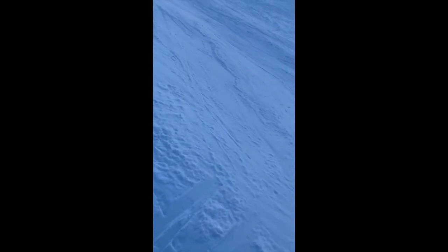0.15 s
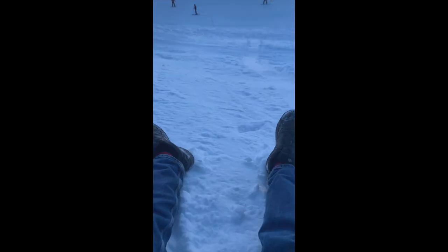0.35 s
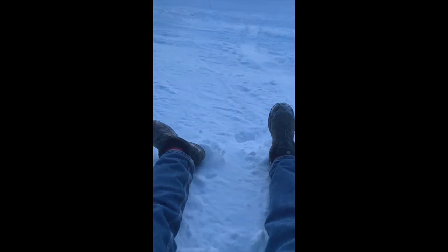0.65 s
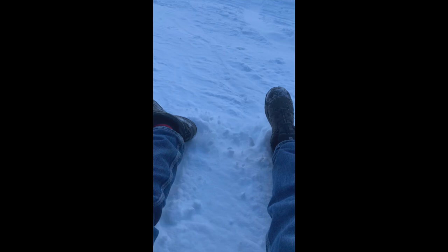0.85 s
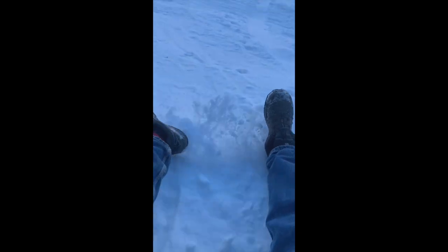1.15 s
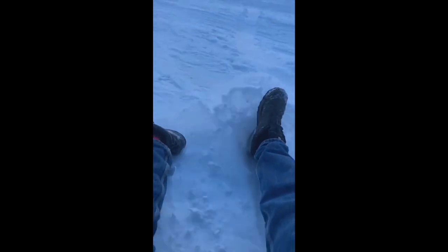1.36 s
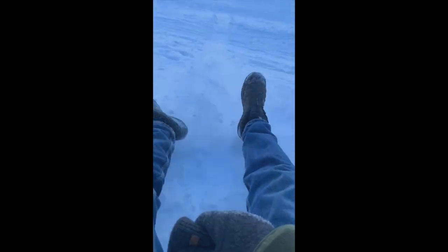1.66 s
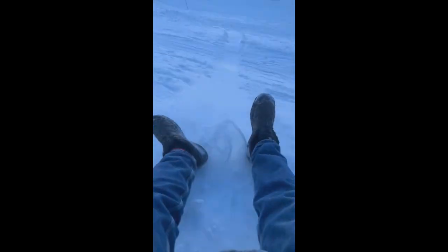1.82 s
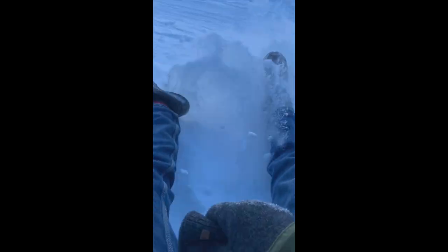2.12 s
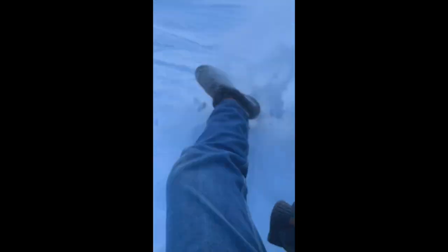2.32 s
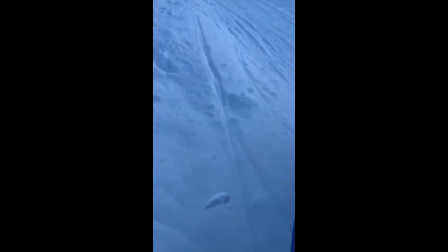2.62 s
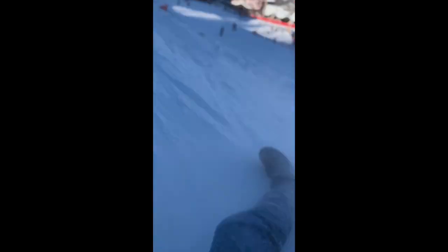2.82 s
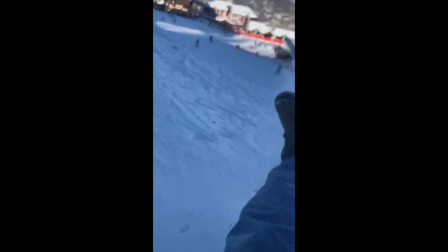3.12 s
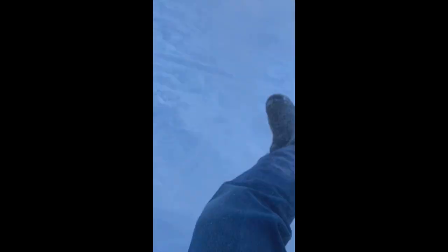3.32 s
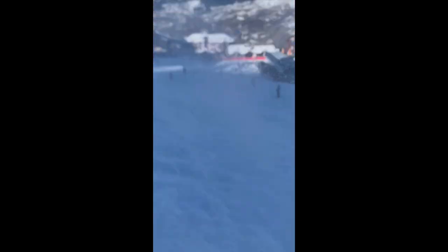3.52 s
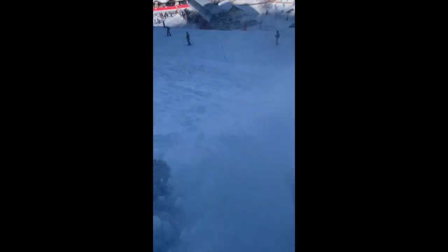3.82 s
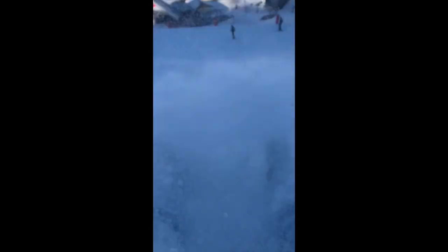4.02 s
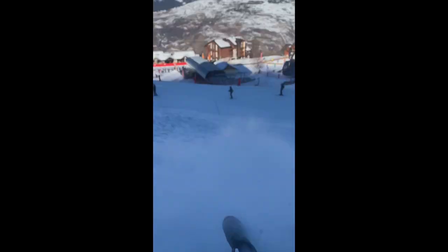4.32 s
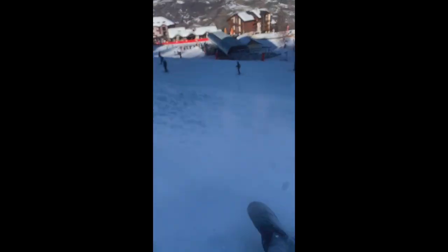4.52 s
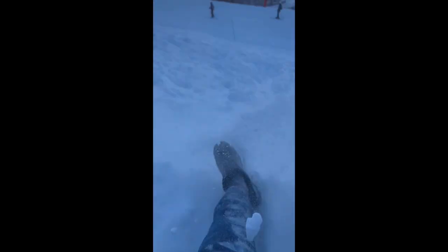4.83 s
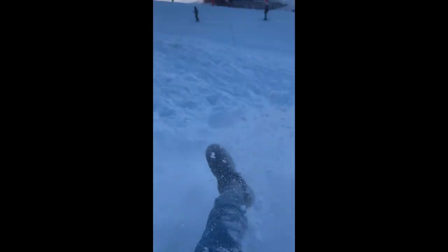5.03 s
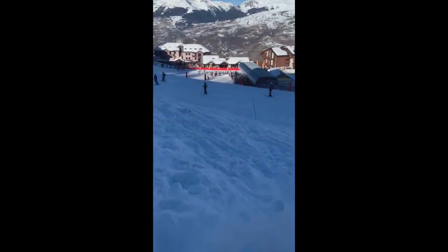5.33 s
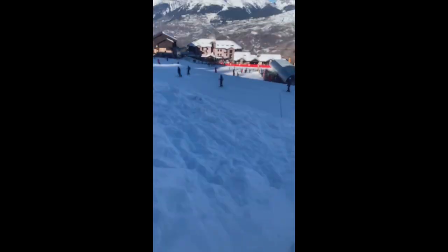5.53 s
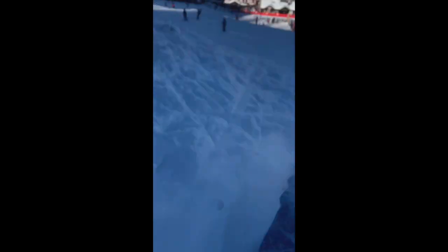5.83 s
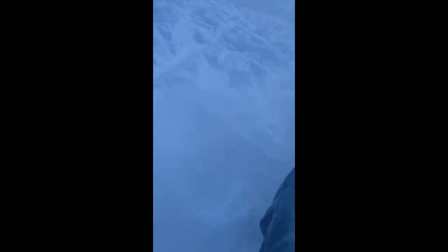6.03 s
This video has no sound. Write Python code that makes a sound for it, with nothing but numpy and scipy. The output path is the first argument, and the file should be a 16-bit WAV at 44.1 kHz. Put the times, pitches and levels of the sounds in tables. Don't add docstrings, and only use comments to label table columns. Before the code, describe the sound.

Bumpy sled ride over snow: after a faint start, hollow plastic thuds, crunching crust and spraying powder build under blustery low wind rumble.

```python
import sys
import numpy as np
from scipy import signal
from scipy.fft import rfft, irfft, next_fast_len
from scipy.io import wavfile
from scipy.ndimage import uniform_filter1d

SR = 44100
rng = np.random.default_rng(int(sys.argv[2]) if len(sys.argv) > 2 else 0)


def how_loud(loudness_db):
    steps = np.asarray(loudness_db, float) / 20
    return 10 ** steps


def generate_wav(signal):
    frames = np.transpose(np.atleast_2d(signal))
    scaled = np.clip(frames, -1, 1) * 32767
    pcm = np.round(scaled).astype(np.int16)
    wavfile.write(sys.argv[1], SR, pcm)


N = 271656


def rms_one(x):
    return x / np.sqrt(np.mean(x ** 2) + 1e-20)


def in_time(rows):
    s, *columns = np.transpose(rows)
    return [np.interp(np.arange(N) / SR, s, column) for column in columns]


def steep(x, hz, kind):
    return signal.sosfilt(signal.butter(6, hz, kind, fs=SR, output="sos"), x)


def drift(rate):
    r = np.exp(-80 * np.pi * rate / SR)
    noise = rng.standard_normal(N // 40 + 2002)
    slow = signal.lfilter([1], [1, -2 * r, r * r], noise)[2000:]
    return np.interp(np.arange(N) / 40, np.arange(len(slow)), rms_one(slow))


def grains(per_s, spread_db):
    sizes_db = spread_db * np.minimum(rng.exponential(1, N), 4.5)
    sizes = how_loud(sizes_db) * rng.choice([-1, 1], N)
    return rms_one(sizes * (rng.random(N) < per_s / SR))


def coloured(spectrum, drive, share, shared_db, own_db, rate):
    hz, level = np.transpose(spectrum)
    edges = hz[0] * 2 ** np.arange(0, np.log2(hz[-1] / hz[0]) + .3, 1 / 3)
    fed = np.sqrt(1 - share) * rng.standard_normal((2, N)) + np.sqrt(share) * drive
    out, together = 0, drift(rate)
    for k, (low, high) in enumerate(zip(edges, edges[1:])):
        band_pass = signal.butter(2, [low, high], "band", fs=SR, output="sos")
        band = signal.sosfilt(band_pass, fed[k % 2])
        level_db = np.interp(np.log(low * high) / 2, np.log(hz), level)
        out = out + band * how_loud(level_db + shared_db * together + own_db * drift(rate * 0.84))
    return rms_one(out)


def evened(x, span_s, share):
    span = int(span_s * SR)
    level = uniform_filter1d(uniform_filter1d(x ** 2, size=span), size=span)
    return rms_one(x / (level + .02) ** (share / 2))


def swells(bed_db, s, peak_db, fall_s, rise):
    crest_round = 1.11
    t = np.arange(0, N, 64) / SR
    age = (t - s[:, None]) / np.maximum(fall_s, .005)[:, None]
    event_db = peak_db[:, None] - 10 * np.maximum(age, -age / rise) ** crest_round
    power = (how_loud(event_db) ** 2).sum(axis=0)
    return 10 * np.log10(how_loud(bed_db) ** 2 + np.interp(np.arange(N) / SR, t, power))


# pitch_hz, level_db
LIFT = [
    (1060, -54),
    (4200, -60),
]


def open_air(level_db):
    hiss = how_loud(level_db) * rms_one(steep(rng.standard_normal((2, N)), [900, 8300], "band"))
    whine = 0
    for hz, db in LIFT:
        tone = steep(rng.standard_normal(N), [hz - 20, hz + 20], "band")
        whine = whine + how_loud(db) * rms_one(tone)
    return hiss + whine


# time_s, level_db
RUSTLE = [
    (0, -55),
    (.2, -69),
    (.3, -59.5),
    (5.35, -55.5),
    (5.6, -52),
    (5.75, -47.5),
    (6.16, -47),
]


def jacket_rustle():
    level_db, = in_time(RUSTLE)
    return how_loud(level_db) * rms_one(steep(rng.standard_normal(N), [3900, 4700], "band"))


# crest_s, level_db, fall_10db_s
GUSTS = [(0, -16, -0.8), (.19, -33.5, 1), (.5, -34, 0.3), (.67, -28, .03), (.95, -28, 0), (1.09, -29, 0.1),
         (1.42, -12.5, -0.09), (1.5, -24, .05), (1.6, -22, -0.1), (1.78, -24, -0.2), (1.93, -38, -0.2),
         (2.0, -29, 0), (2.1, -21, 0.04), (2.24, -43, 0.4), (2.3, -31, 0), (2.57, -25, 0.1),
         (2.63, -18, -0.01), (2.784, -6.5, 0.0133), (2.9, -21, 0.08), (3.04, -13, -0.02), (3.28, -29, 0.7),
         (3.41, -16, -0.02), (3.52, -35, 0.7), (3.62, -26.5, 0.12), (3.72, -24, 0.14), (3.91, -20, 0.03),
         (4.04, -22, 0), (4.22, -18.5, 0.04), (4.3, -19, -0.18), (4.56, -23, 0.13), (4.95, -23.5, 0.27),
         (5.08, -28, 0.4), (5.22, -20, 0.07), (5.37, -20, 0), (5.64, -19.5, 0.2), (5.75, -19, -0.12),
         (5.9, -22, .04), (6.11, -18.5, 0.27)]


def gust_level():
    calm_db = -46 + 1.5 * np.arange(N) / SR
    return swells(calm_db, *np.transpose(GUSTS), rise=0.94)


# frequency_hz, density_db_per_hz
DEEP = [(13, -39), (22, -28), (64, 2.5), (119, -1), (170, -6), (220, -19), (370, -120)]


def wind_buffet():
    buffet = coloured(DEEP, rng.standard_normal(N), share=0.89, shared_db=-2.5, own_db=1.5, rate=7.3)
    return evened(buffet, span_s=0.038, share=0.59)


# frequency_hz, density_db_per_hz
FLUTTER = [(100, -37), (170, -1), (350, 6.5), (500, 4.5), (650, 2.5), (800, -20), (1000, 6)]
# time_s, flutter_db, unfolded_bass_re_flutter_db
CROSS = [(0, -46, -1), (.13, -53.5, 0), (.3, -47, -2), (.8, -45, -17), (1.0, -40, -24), (1.5, -36, -7.5),
         (1.9, -29, 3), (2.3, -24, -7), (2.62, -32.5, 8), (2.8, -23, -3), (3.2, -21.5, -4), (3.4, -25, -46),
         (4.0, -35, -56), (4.4, -39, -68.5), (4.7, -36, -69), (5.15, -38.5, -22), (5.75, -21.5, -37),
         (6.16, -29.5, -31)]


def port_wind(deep, hull_db):
    steady_db, unfolded_db = in_time(CROSS)
    jolt_db = hull_db - uniform_filter1d(hull_db, size=SR // 3)
    flutter_db = steady_db + 0.56 * jolt_db
    deep_db = flutter_db + unfolded_db
    eddies = grains(per_s=91, spread_db=3.0)
    flutter = coloured(FLUTTER, eddies, share=.4, shared_db=3.5, own_db=2.0, rate=22)
    bass = signal.sosfiltfilt(signal.butter(4, 400, fs=SR, output="sos"), flutter)
    low_db = np.minimum(flutter_db, deep_db + 20)
    low = how_loud(low_db + 2.5) * bass
    high = how_loud(flutter_db + 2.5) * (flutter - bass)
    return how_loud(deep_db - 3) * deep + low + high


# centre_s, half_length_s, hull_drop_db, scrape_drop_db
HOPS = [(0.095, 0.1, 6, 5.5), (0.903, .04, -4, -1.5), (1.306, 0.021, 5, 2.5), (1.518, 0.015, 2.5, 2),
        (1.805, 0.02, 6, 7.5), (1.882, 0.026, 12, 4), (2.18, 0.021, 13, 4), (2.407, 0.023, 10, 0.5),
        (2.576, 0.011, 7, 9), (2.622, 0.01, -2, 14), (2.675, 0.047, 11, 1.5), (2.905, .02, 14, 2),
        (3.067, 0.039, 10, 5), (3.22, 0.039, 10, 6), (3.332, 0.013, 12, 0.5), (3.58, 0.019, 5, -0.5),
        (3.792, 0.027, 7, 6), (4.075, 0.014, 8, 3.5), (4.335, .02, -4, 0.5), (4.49, 0.023, 3, 1.5),
        (4.817, 0.037, 5, 3.5), (5.032, 0.026, 12, 4.5), (5.134, 0.025, 15, 5.5), (5.235, .02, 9, 2.5),
        (5.49, 0.054, 10, 6.5), (5.764, .02, 7, 1), (5.85, 0.012, 8.5, 4.5), (6.066, 0.014, 4, 2)]


def hops():
    s, half_s, *drops_db = np.transpose(HOPS)
    t = np.arange(0, N, 64) / SR
    clear = np.exp(-((t - s[:, None]) / half_s[:, None]) ** 2)
    return [np.interp(np.arange(N) / SR, t, drop_db @ clear) for drop_db in drops_db]


# time_s, level_db
SPRAY = [(0, -54), (.03, -74), (.2, -71), (.24, -45.5), (.63, -44.5), (1.05, -35.5), (1.52, -47.5),
         (1.68, -40), (1.8, -35), (2.2, -39.5), (2.6, -37.5), (3.05, -38), (3.3, -34.5), (3.55, -35.5),
         (3.85, -34), (4.3, -38.5), (5.0, -37.5), (6.16, -41)]
# crest_s, scrape_db, fall_10db_s, powder_re_scrape_db
PATCHES = [(.03, -41, 0.4, -28), (.08, -52, -0.3, -6), (1.1, -42.5, 0.2, -4), (1.39, -32.5, 0.01, 1.5),
           (1.456, -34, -0.01, 6), (1.57, -33, 0.53, -7), (1.75, -35, -0.07, 3), (1.9, -37, -0.03, -3),
           (1.97, -36, 0, -5), (2.06, -32, 0.12, -4), (2.282, -28.5, 0.09, -1), (2.46, -29.5, 0.09, -5.5),
           (2.52, -30, 0.02, -14), (2.555, -33, -0.05, -10), (2.6, -32.5, -0.04, -10),
           (2.709, -31.5, 0, -5), (2.826, -26, -0.01, -4), (2.998, -31.5, 0.22, -19.5),
           (3.127, -29, 0.1, -14), (3.29, -35, -0.17, 7.5), (3.33, -33, 0.03, 1.5), (3.379, -22, -0.04, 0),
           (3.46, -30, 0.1, -28), (3.728, -25, 0.04, -9.5), (3.93, -24, -0.09, -11), (4.01, -35, -0.24, 5),
           (4.1, -31, 0.2, -13), (4.3, -39, 0.7, -20), (4.44, -33.5, -1, -6.5), (4.56, -25.5, -0.02, -1),
           (4.63, -27, 0.09, -7.5), (4.69, -30.5, 0.04, -2.5), (4.738, -24, 0.04, -6),
           (4.93, -35, -0.1, -3.5), (5.27, -35.5, 0.7, -34), (5.68, -33, 0.015, 2), (5.71, -35, 0.01, 1.5),
           (5.832, -26, 0.07, -4), (5.89, -29, -0.03, -3), (5.96, -31, 0, 0), (6.05, -29.5, 0.04, -3)]


def snow_levels():
    spray_db, = in_time(SPRAY)
    s, peak_db, fall_s, kicked_db = np.transpose(PATCHES)
    powder_db = peak_db + kicked_db
    glide_db = np.maximum(spray_db + 0.5, -63)
    scrape_db = swells(glide_db, s, peak_db, fall_s, rise=1.0)
    grit_db = swells(spray_db - 5.5, s, powder_db - 7, fall_s, rise=1.0)
    return scrape_db, grit_db, swells(spray_db, s, powder_db, fall_s, rise=1.0)


# frequency_hz, density_db_per_hz
CRUST = [(300, -9.5), (500, -2.5), (800, 3), (1200, -6), (1700, -9.5), (2200, -15), (3000, -18),
         (4500, -13)]
# frequency_hz, density_db_per_hz
POWDER = [(1200, -14), (2200, -2), (3400, 1), (4300, 1), (5000, 0), (8000, 0), (12000, 0), (16000, 0)]
# time_s, upper_scrape_re_lower_db
HARDNESS = [(0, 1.5), (.5, 3), (1.0, 2), (1.5, -7.5), (1.9, 1.5), (2.2, 2.5), (2.5, -1), (2.8, 12.5),
            (3.0, -5), (3.17, 11.5), (3.4, 1), (3.8, 1.5), (4.2, 2.5), (4.6, 0.5), (5.0, 2.5), (5.4, 0.5),
            (5.8, 3.5), (6.16, -0.5)]


def snow_layers():
    hard_db, = in_time(HARDNESS)
    crunch = grains(per_s=900, spread_db=-1.5)
    crust = coloured(CRUST, crunch, share=0.37, shared_db=1.74, own_db=1.44, rate=35)
    soft = signal.sosfiltfilt(signal.butter(2, 977, fs=SR, output="sos"), crust)
    crust = soft * how_loud(-hard_db / 2) + (crust - soft) * how_loud(hard_db / 2)
    powder = coloured(POWDER, crunch, share=.2, shared_db=1.3, own_db=.6, rate=30)
    grit = rms_one(steep(powder, 4300, "low"))
    fine = rms_one(steep(powder, 4000, "high"))
    return np.array([crust, grit, fine])


# start_s, peak_db, brightness_db
CRACKS = [(0.024, -31, -22), (0.564, -27, -20), (0.645, -24, -19), (0.756, -31.5, -14), (0.974, -16, -26),
          (1.019, -22.5, -23), (1.099, -21, -19), (1.275, -21, -14), (1.325, -21, -18), (1.358, -22, -20),
          (1.381, -21, -19), (1.455, -14, -28), (1.497, -22, -27), (1.53, -24, -14), (1.664, -31, -21),
          (1.744, -14, -29.5), (1.9, -16.5, -23), (1.939, -26, -15), (1.954, -15, -17), (2.012, -16, -24),
          (2.055, -14, -17), (2.179, -24, -22), (2.259, -31, -16), (2.317, -14, -11), (2.344, -18, -9),
          (2.512, -11, -12.5), (2.593, -17, -9.5), (2.63, -29, -14), (2.922, -18.5, -12), (2.959, -22, -15),
          (3.02, -36, -22.5), (3.064, -23, -23), (3.127, -5, -34), (3.293, -6.5, -12.5), (3.355, -10, -10),
          (3.38, -6, -13.5), (3.466, -23, -20), (3.679, -12, -21), (3.723, -30, -20), (3.815, -17, -10),
          (3.864, -19.5, -15), (3.89, -13, -16), (3.916, -13, -21), (3.972, -18, -10), (4.014, -16, -7),
          (4.088, -16, -15), (4.3, -17, -17), (4.433, -15.5, -14), (4.536, -13, -10), (4.622, -21, -14),
          (4.72, -10, -12), (4.925, -13, -20), (5.055, -17, -10), (5.233, -27, -20), (5.5, -21, -15),
          (5.523, -24, -18.5), (5.665, -15.5, -11), (5.806, -12.5, -9), (5.967, -17, -9), (6.077, -17, -20)]


def cracks(decay_s, gain_db):
    out, t = np.zeros((2, N + 1500)), np.arange(1500) / SR
    envelope = t / decay_s * np.exp(1 - t / decay_s)
    for s, peak_db, bright_db in CRACKS:
        burst = how_loud(peak_db + gain_db) * rng.standard_normal(len(t)) * envelope
        out[:, round(s * SR):][:, :len(t)] += burst * how_loud([[0], [bright_db]])
    body, bright = out[:, :N]
    dull = signal.sosfilt(signal.butter(2, [380, 1500], "band", fs=SR, output="sos"), body)
    puff = signal.sosfilt(signal.butter(2, 3000, "high", fs=SR, output="sos"), bright)
    snap = signal.sosfilt(signal.butter(2, [1500, 3500], "band", fs=SR, output="sos"), body)
    return 5.8 * dull + 3.0 * puff + 1.6 * snap


# frequency_hz, lead_rad
PORT_PHASE = [(100, 0.0), (430, .1), (700, 2.1), (1250, 1.65), (1850, -.05), (2600, -2.3), (3400, -1.55),
              (4665, -3.14)]
PATH_TURN_HZ = 4245


def two_ports(x, stray, stray_share, dwell):
    size = next_fast_len(N + 2048)
    hz = np.arange(size // 2 + 1) * SR / size
    at, lead = np.transpose(PORT_PHASE)
    gap = np.interp(hz, at, lead) - 2 * np.pi * np.maximum(hz - at[-1], 0) / PATH_TURN_HZ
    gap -= dwell * np.sin(2 * gap) * np.clip((hz - 3400) / 600, 0, 1)
    mixed = np.sqrt(1 - stray_share) * x + np.sqrt(stray_share) * stray
    mid = irfft(rfft(x, size) * np.cos(gap / 2), size)[:N]
    side = irfft(rfft(mixed, size) * -1j * np.sin(gap / 2), size)[:N]
    return mid + how_loud(-.6) * side * [[1], [-1]]


# time_s, load_db, rim_lean_db
LOAD = [(0, -39.5, -23), (.19, -44, -7.5), (.24, -29.5, 3.5), (.86, -32.5, 4.5), (1.0, -25.5, 2.5),
        (1.6, -20, 6.5), (1.72, -29.5, 4.5), (1.9, -36, 6.5), (2.5, -27.5, 4.5), (2.7, -30, -20),
        (2.85, -22.5, -5.5), (3.1, -27.5, 1), (3.85, -28, -5), (4.5, -21.5, 4.5), (5.0, -25.5, 1.5),
        (5.58, -17, -14), (5.76, -27.5, -10), (6.16, -40, -7.5)]
# crest_s, strength_db, fall_10db_s, rim_lean_db
DRIFTS = [(1.04, -17, 0.02, 5), (1.2, -23, -0.23, 9), (1.418, -19, 0.0367, 5), (1.64, -18, 0.0533, -7),
          (1.752, -12, 0, 6.5), (2.031, -17, 0.01, 7), (2.3, -22.5, 0.09, -11), (2.48, -29, -0.46, 7),
          (2.63, -31, 0.2, -25), (2.78, -21.5, 0.04, -35), (2.989, -19.5, -0.08, 6),
          (3.127, -19, -0.08, -11), (3.191, -14, 0, -11), (3.302, -19.5, -0.0732, 21),
          (3.4, -19.5, 0.24, -22.5), (3.504, -12.5, 0.01, 6.5), (3.717, -13, 0.0245, 3.5),
          (3.949, -14, 0, 1), (4.167, -13, 0.106, -3), (4.29, -15, 0.01, -9), (4.562, -10.5, 0.024, -3),
          (4.747, -8, 0.0265, 1.5), (4.97, -18.5, 0.02, -8), (5.098, -17.5, 0.17, -17.5),
          (5.2, -14.5, 0.12, -23), (5.34, -17.5, 0.26, -24), (5.667, -7.5, -0.23, 1),
          (5.82, -14.5, 0.05, -15), (5.9, -8, -0.04, 0.5), (6.1, -20, 0.4, -40)]


def hull_levels():
    load_db, lean_db = in_time(LOAD)
    s, peak_db, fall_s, rim_db = np.transpose(DRIFTS)
    hull_db = swells(load_db, s, peak_db, fall_s, rise=1.5)
    return hull_db, swells(load_db + lean_db, s, peak_db + rim_db, fall_s, rise=1.5)


# frequency_hz, density_db_per_hz
HULL = [(90, -23), (150, -6.5), (210, -0.5), (270, 0), (350, -0.5), (480, -4.5), (600, -11), (750, -7)]


def hull_drumming(hull_db, rim_db):
    knocks = grains(per_s=130, spread_db=4.5)
    drum = coloured(HULL, knocks, share=0.48, shared_db=3.0, own_db=1.36, rate=52.0)
    hull = evened(rms_one(steep(drum, 428, "low")), span_s=0.034, share=0.47)
    rim = rms_one(steep(drum, [430, 650], "band") * how_loud(0.66 * drift(92)))
    rim = evened(rim, span_s=0.031, share=0.79)
    return how_loud(hull_db) * hull + how_loud(rim_db - 7.5) * rim


# start_s, peak_db, ring_hz, cycles_to_crest
LUMPS = [(0.67, -16, 181, 0.58), (0.971, -12, 410, 1), (1.102, -9, 160, 0.61), (1.172, -11.5, 284, 1),
         (1.32, -11, 523, 0.9), (1.364, -7, 293, 0.75), (1.404, -7, 158, 0.68), (1.503, -7, 378, 0.81),
         (1.527, -4, 296, 0.6), (1.639, -8, 257, 0.96), (1.741, -4, 336, 1), (2.058, -6, 293, 0.96),
         (2.218, -22, 253, 0.9), (2.278, -5, 306, 1), (2.43, -14, 310, 0.99), (2.467, -11.5, 275, 0.9),
         (2.512, -7, 301, 0.73), (2.605, -15.5, 155, 0.99), (2.71, -17.5, 220, 0.8), (2.765, -2, 182, 0.8),
         (2.832, -13, 277, 1), (2.931, -17, 199, 0.76), (3.122, -13, 254, 0.77), (3.295, -2, 268, 0.72),
         (3.354, -8, 202, 0.72), (3.494, -10, 263, 1), (3.61, -10.5, 246, 1), (3.822, -16, 220, 0.9),
         (3.88, -6.5, 274, 0.86), (3.935, -3.5, 278, 0.97), (4.014, -5.5, 513, 1), (4.092, -7, 344, 0.64),
         (4.363, -5, 274, 0.9), (4.404, -10, 304, 0.9), (4.435, -4.5, 390, 1), (4.566, -2, 229, 0.78),
         (4.859, -7, 240, 0.71), (5.089, -10, 205, 0.44), (5.191, -4.5, 313, 1), (5.275, -24, 444, 0.9),
         (5.278, -3.5, 233, 0.74), (5.43, -9.5, 285, 0.71), (5.466, -14, 363, 1), (5.729, -8, 265, 0.99),
         (5.777, -12, 356, 0.98), (5.813, -6, 267, 0.7), (5.886, -5, 175, 0.61), (5.953, -5, 285, 0.79),
         (6.006, -9, 304, 0.9), (6.081, 1, 281, 0.64)]


def lumps(gain_db):
    sag = 0.082
    bounce_cycles, bounce_db = 3.0, -5.5
    out, t = np.zeros(N + 4410), np.arange(4410) / SR
    for (s, peak_db, hz, cycles), turn in zip(LUMPS, rng.random(len(LUMPS))):
        age = t * hz / cycles
        phase = 1.12 * np.log1p(sag * hz * t) / sag + turn
        shape = age * np.exp(1 - age) * np.sin(2 * np.pi * phase)
        lag = int(bounce_cycles / hz * SR)
        shape[lag:] += how_loud(bounce_db) * shape[:len(t) - lag]
        out[round(s * SR):][:len(t)] += how_loud(peak_db + gain_db) * shape
    return out[:N]


# time_s, level_db
ASIDE = [
    (0, -5),
    (2.25, -0.5),
    (2.5, -4),
    (3.25, -8),
    (3.5, -7),
    (5.3, -16),
    (6.16, -4),
]


def from_aside(hull):
    size = next_fast_len(N + 2048)
    hz = np.arange(size // 2 + 1) * SR / size
    lead = irfft(rfft(hull, size) * -1j * np.minimum(hz / 774, 1), size)[:N]
    aside_db, = in_time(ASIDE)
    folded = np.arange(N) / SR > 3.3
    return how_loud(aside_db) * np.where(folded, steep(lead, 500, "high"), lead)


# time_s, left_minus_right_db
TURN = [
    (0, -1.2),
    (.7, -2.6),
    (1.3, -2.8),
    (1.8, -2),
    (2.4, -.5),
    (2.8, .4),
    (3.2, 0),
    (6.16, 0),
]


def scene():
    deep_db = gust_level()
    hull_db, rim_db = hull_levels()
    scrape_db, grit_db, spray_db = snow_levels()
    hull_off_db, scrape_off_db = hops()
    hull_db, rim_db = hull_db - hull_off_db, rim_db - hull_off_db
    scrape_db, grit_db = scrape_db - scrape_off_db, grit_db - 0.55 * scrape_off_db

    buffet = wind_buffet()
    body = hull_drumming(hull_db, rim_db) + lumps(gain_db=-3.0)
    common = how_loud(deep_db) * buffet + body + jacket_rustle()
    turn_db, = in_time(TURN)
    turned = common * how_loud([turn_db / 2, -turn_db / 2])

    levels = how_loud([scrape_db + 6.0, grit_db + 4.0, spray_db + 5.5])
    layers = snow_layers()
    breaks = cracks(decay_s=0.0017, gain_db=-7.0)
    snow = (levels * layers).sum(axis=0) + breaks
    unrelated = (levels * np.roll(layers, N // 3, axis=1)).sum(axis=0) + breaks
    airborne = two_ports(snow, unrelated, stray_share=.5, dwell=.21)
    diffuse_band = signal.butter(2, [1400, 2200], "band", fs=SR, output="sos")
    diffuse = how_loud(-4.5) * signal.sosfilt(diffuse_band, unrelated)

    opposed = port_wind(np.roll(buffet, N // 2), hull_db) + from_aside(body) + diffuse
    return turned + opposed * [[1], [-1]] + airborne + open_air(level_db=-61)


def band_limit(x):
    return signal.sosfilt(signal.butter(12, 17090, fs=SR, output="sos"), x)


def record(dry):
    soft = .98 * np.tanh(dry / .98)
    top_cut = signal.ellip(12, .5, 60, 15780, fs=SR, output="sos")
    mix = signal.sosfilt(top_cut, soft)
    return band_limit(mix)


dry = scene()
out = record(dry)
generate_wav(out)
```